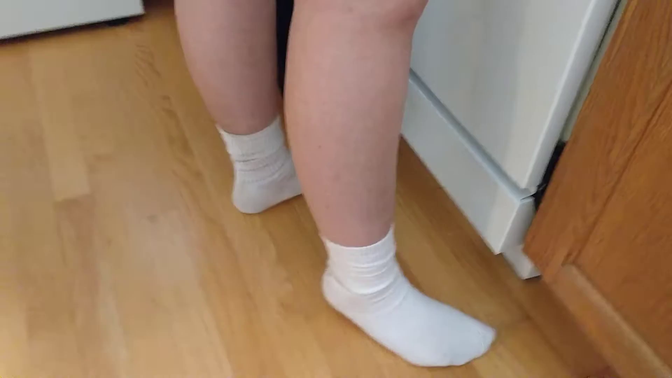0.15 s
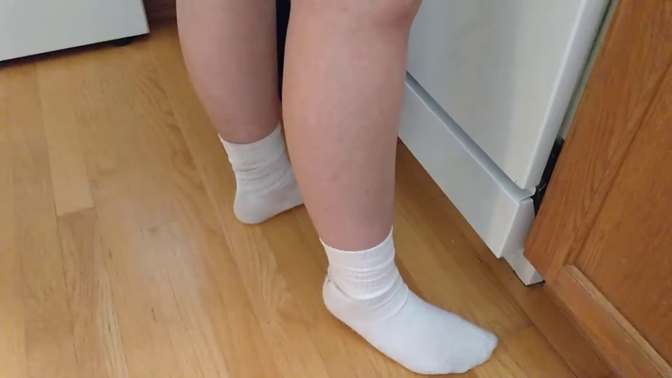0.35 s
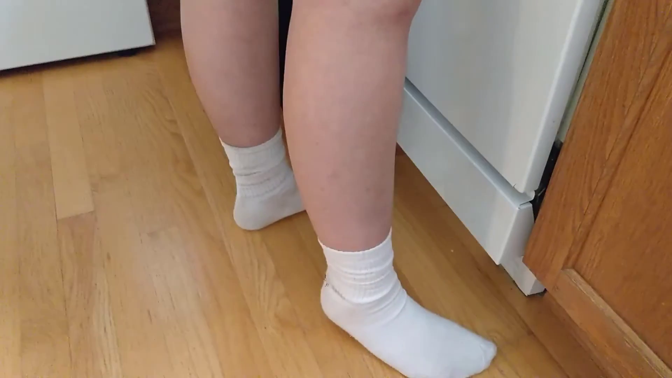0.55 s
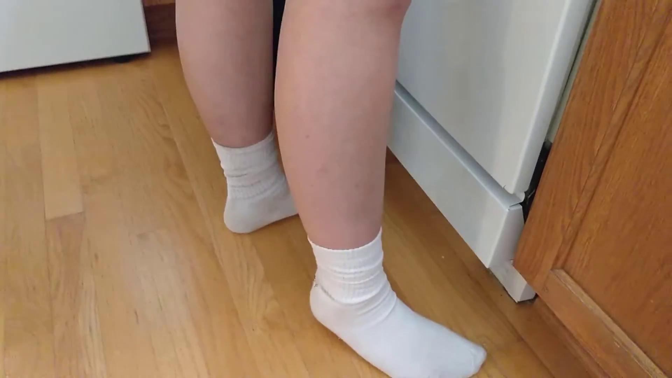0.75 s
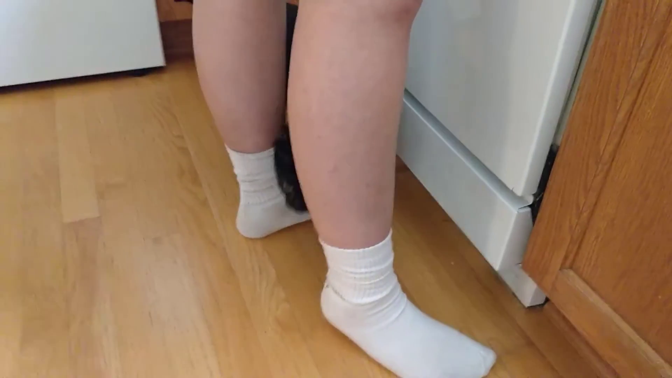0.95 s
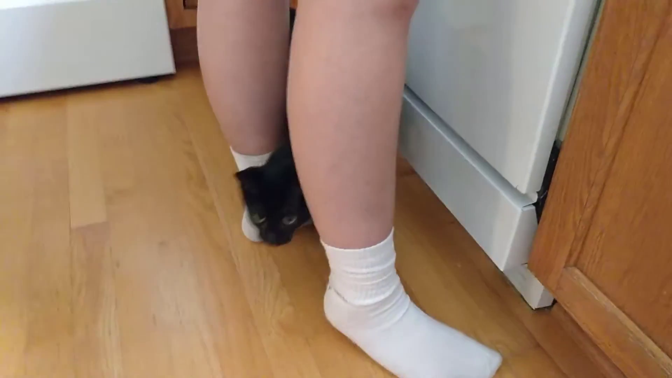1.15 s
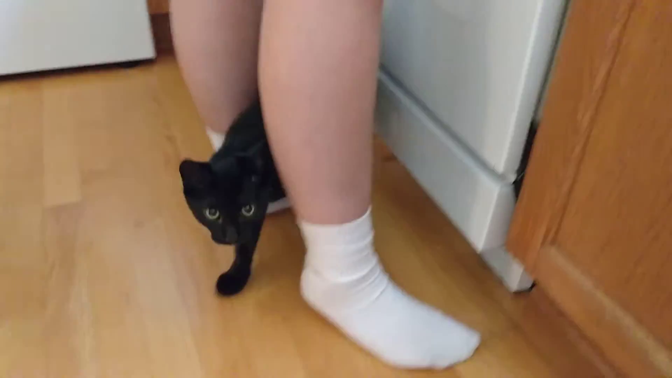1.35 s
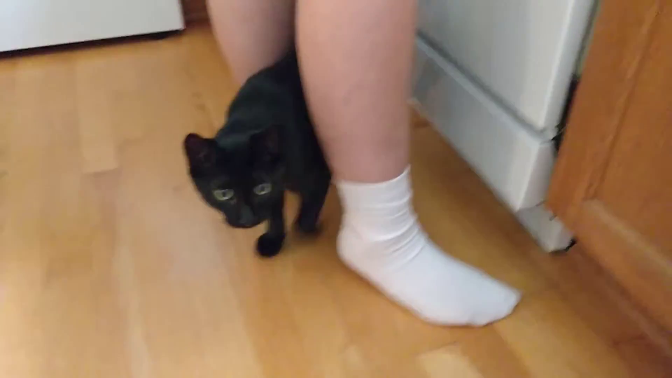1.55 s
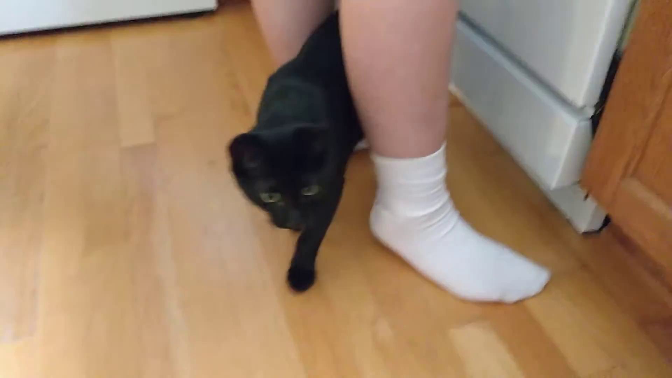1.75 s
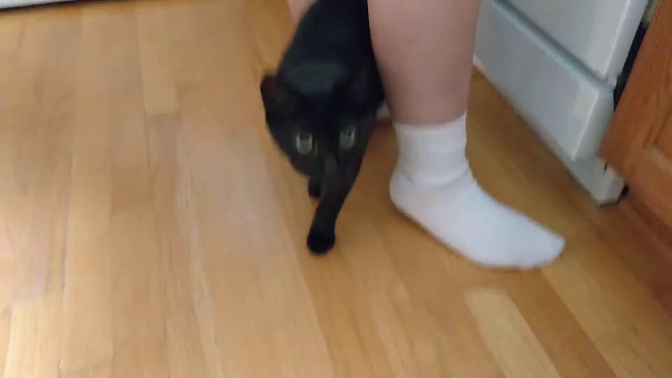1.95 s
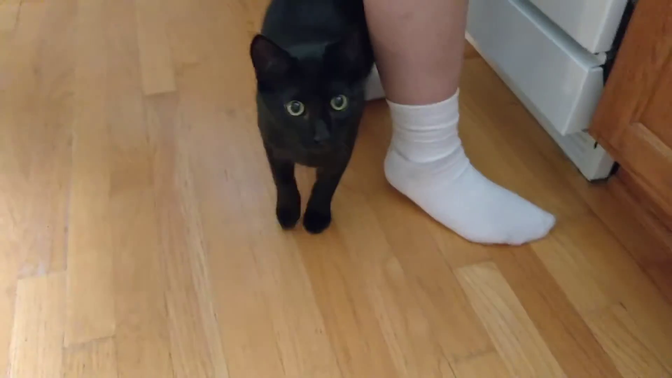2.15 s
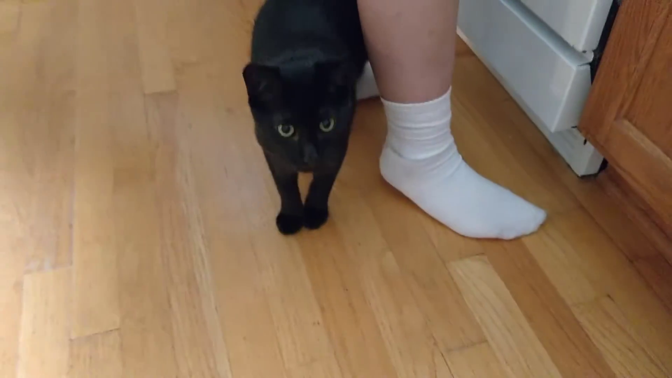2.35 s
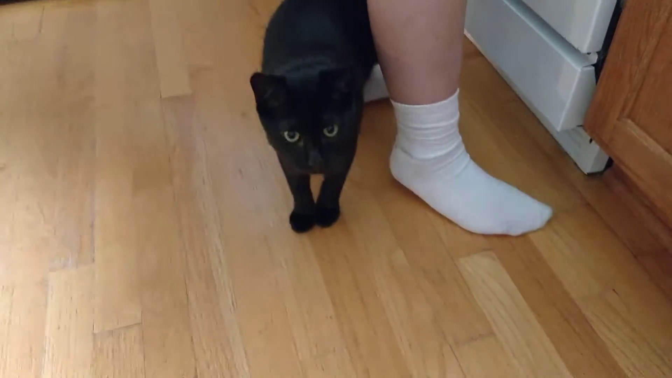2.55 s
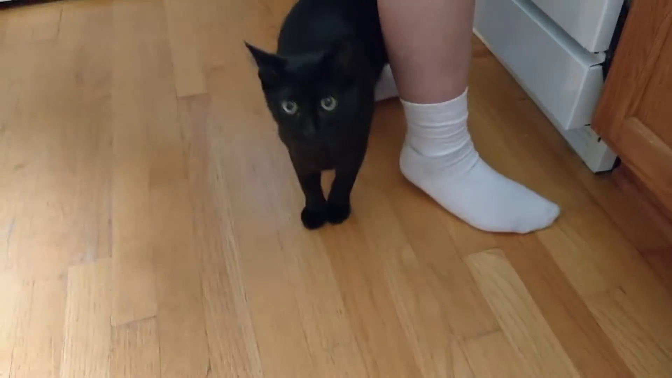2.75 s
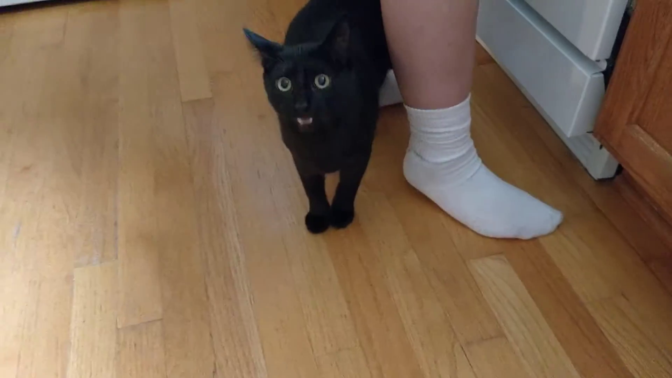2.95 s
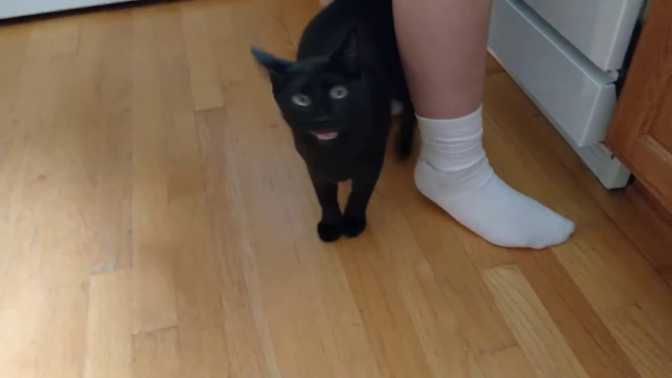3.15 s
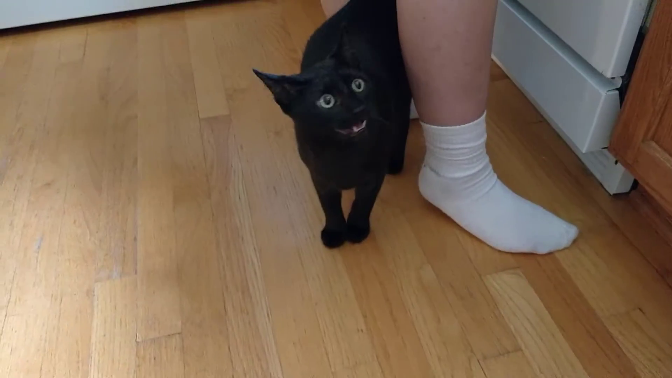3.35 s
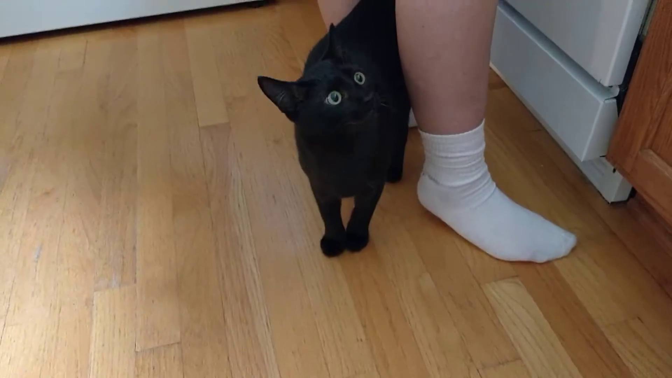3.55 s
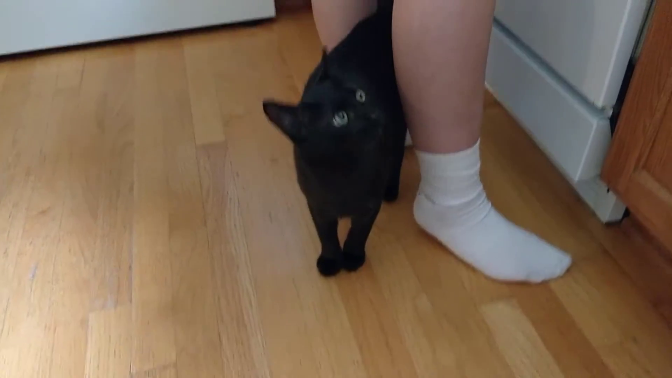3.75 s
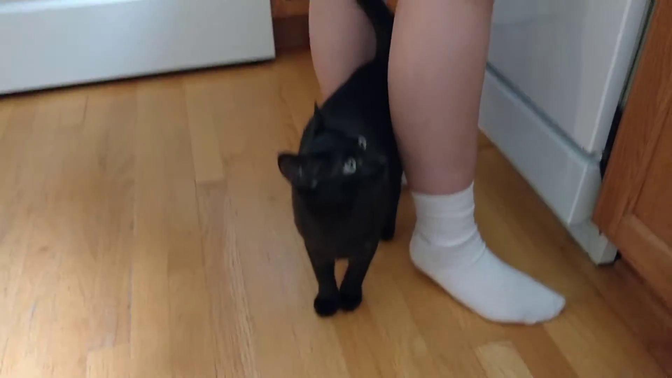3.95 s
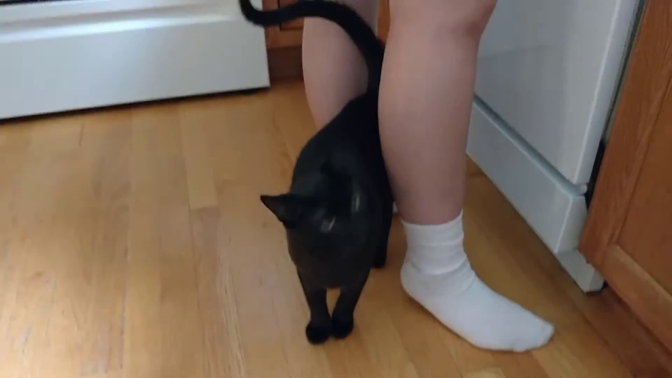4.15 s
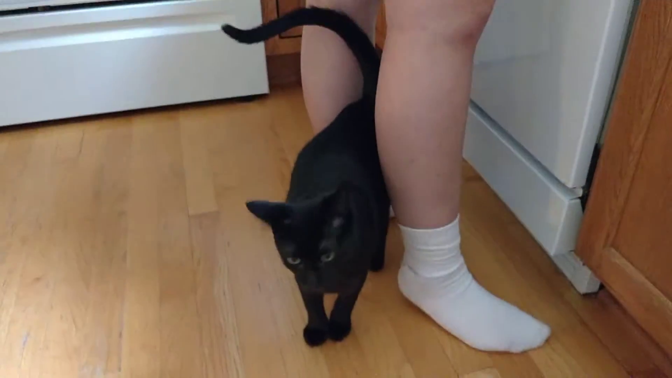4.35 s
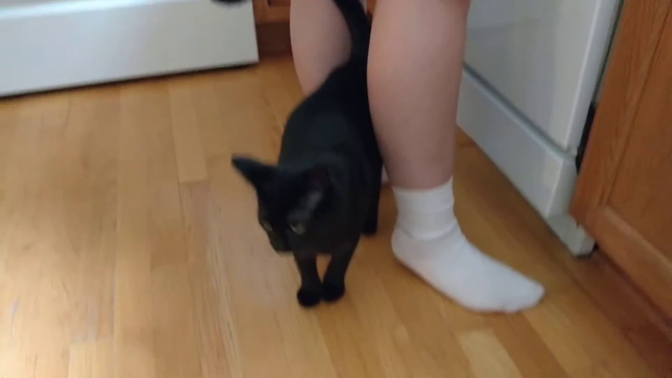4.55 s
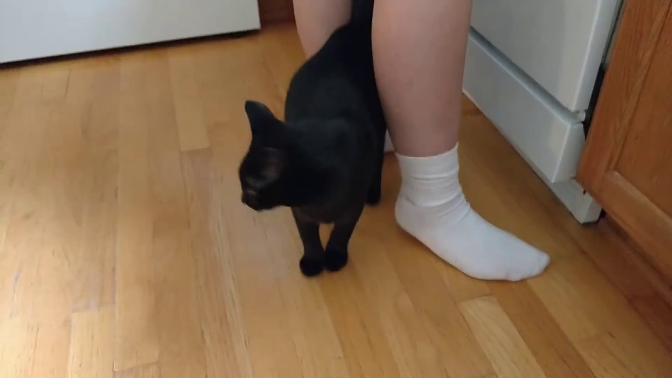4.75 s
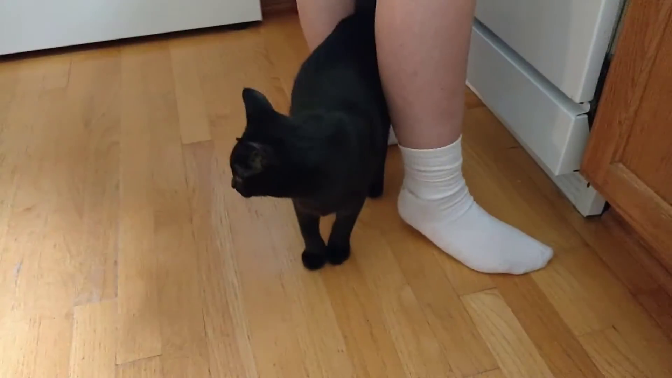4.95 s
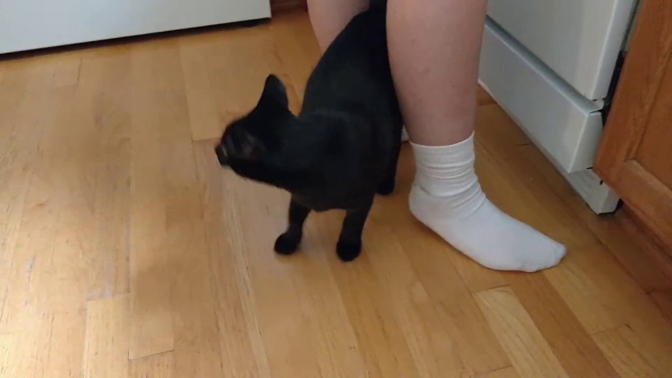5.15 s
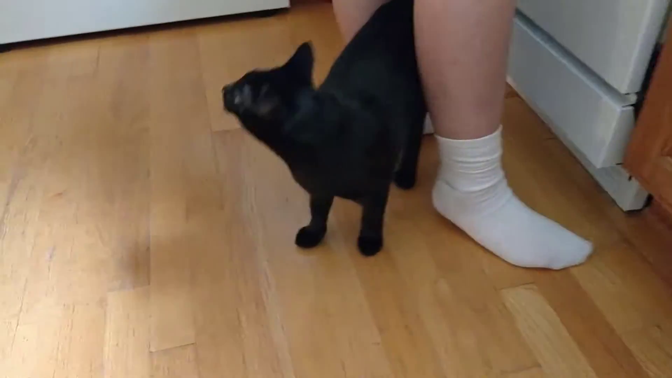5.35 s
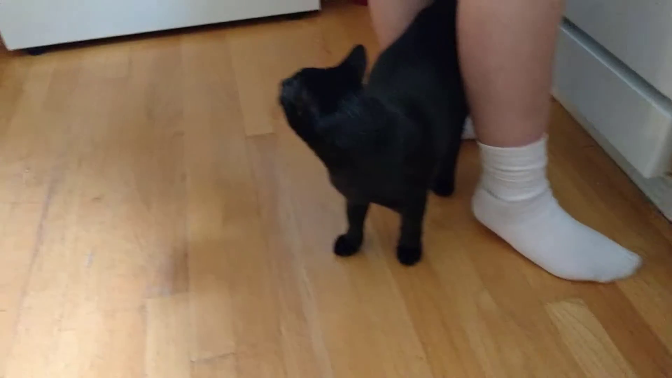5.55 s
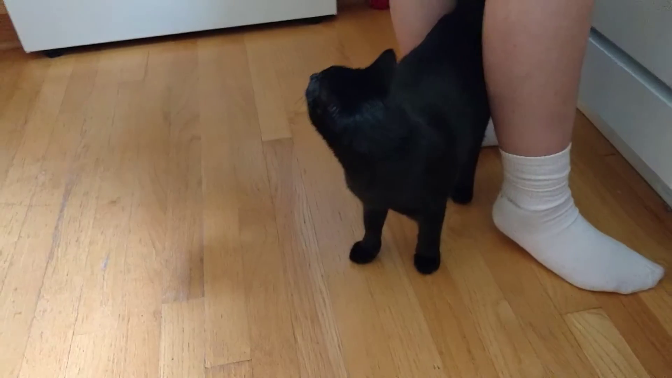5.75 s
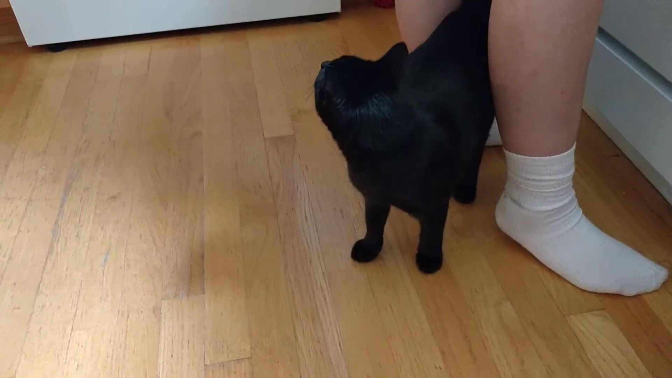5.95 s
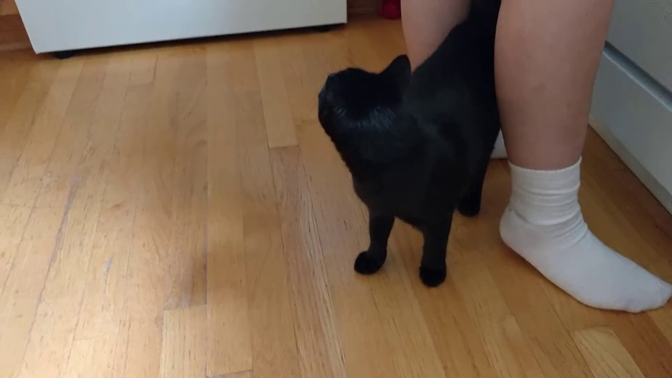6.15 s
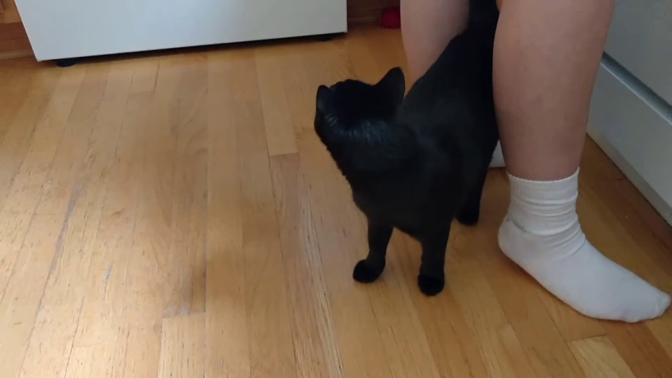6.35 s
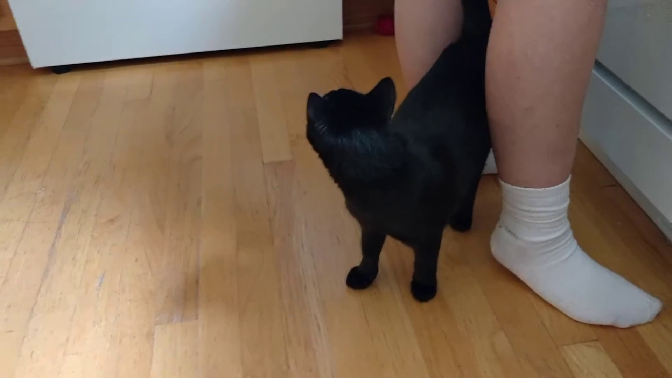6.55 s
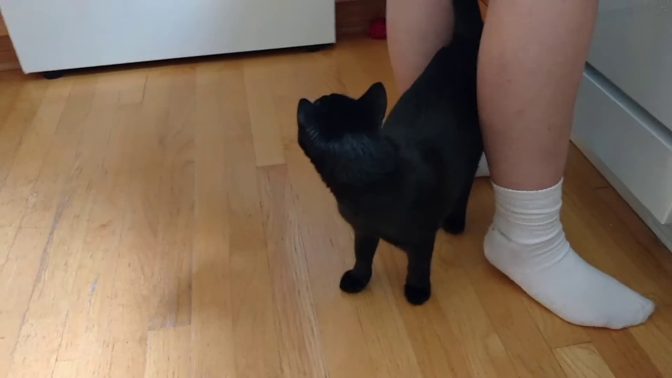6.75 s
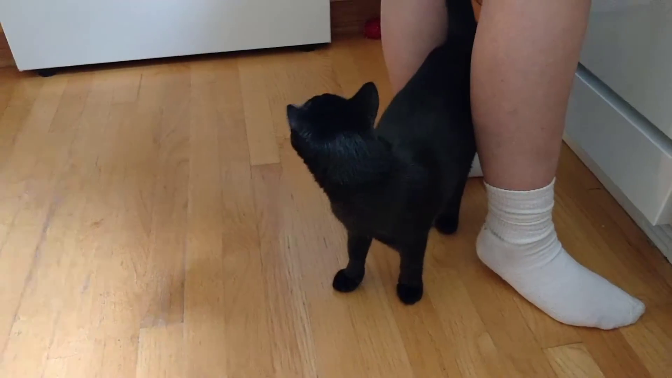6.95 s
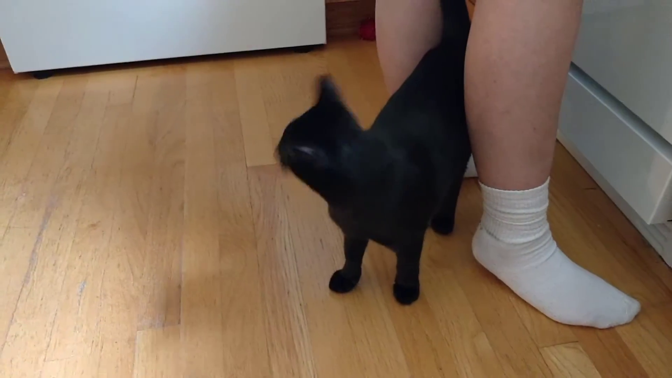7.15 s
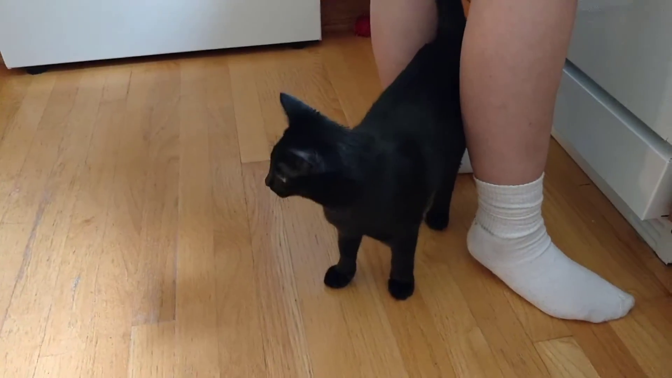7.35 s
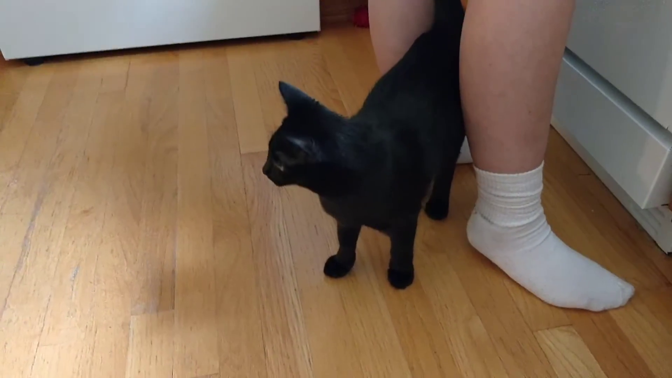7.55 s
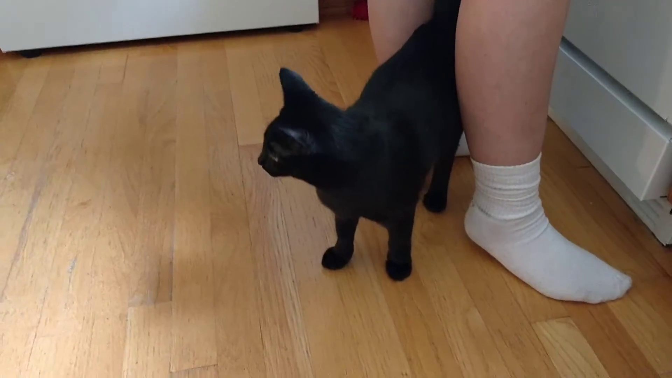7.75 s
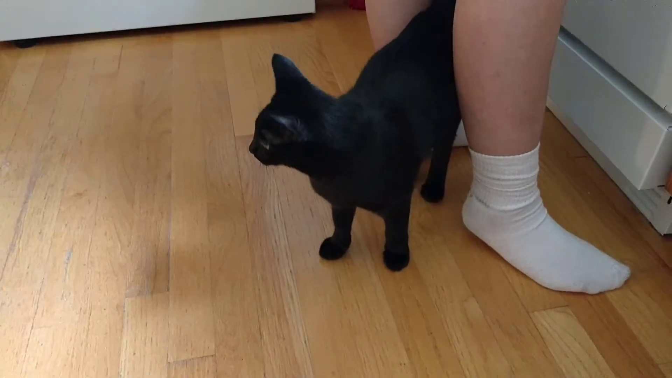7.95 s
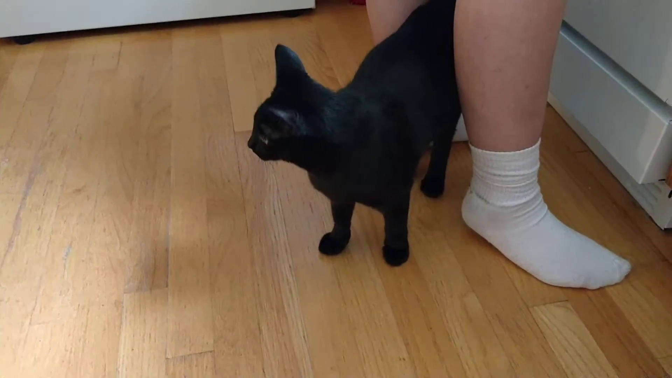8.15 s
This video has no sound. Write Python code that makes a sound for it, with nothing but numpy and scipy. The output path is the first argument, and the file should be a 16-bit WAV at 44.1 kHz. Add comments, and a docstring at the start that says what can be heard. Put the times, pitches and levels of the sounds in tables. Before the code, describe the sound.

In a small kitchen with a wooden floor, a soft low appliance rumble and wavering motor hum run throughout. A rustle and a hard ringing dish knock come first, then a few ticks. From about three seconds a black kitten gives three clear, slightly hoarse meows, each closing in a short croak. Dish knocks fall around the later meows, and a fourth, much quieter meow ends it. Close stereo pickup, short room tail.

```python
"""First a low appliance rumble, with a rustle and a hard knock of dishes on the counter above.
The rumble and a motor hum are noise and a wavering tone; knocks, ticks and rustles are bursts of noise.
From 2.8 s a young cat meows four times on a wooden kitchen floor, a metre from two microphone ports.
Each meow is a stack of sine overtones, made louder or softer by a moving mouth and throat.
Short croaks are puffs of low noise, and a small hard room adds a tail to all the near sounds."""
import sys
import numpy as np
from scipy import signal
from scipy.fft import rfft, irfft
from scipy.io import wavfile
from scipy.ndimage import uniform_filter1d

SR = 44100
rng = np.random.default_rng(int(sys.argv[2]) if len(sys.argv) > 2 else 0)


def output_pcm(signal):
    """Save a mono or channel-first signal as 16-bit PCM at the path in sys.argv[1].

    Samples are clipped to [-1, 1] before scaling.
    """
    pcm = np.clip(np.atleast_2d(signal).T, -1, 1) * 32767
    wavfile.write(sys.argv[1], SR, np.round(pcm).astype(np.int16))


N = 361619  # length in samples, 8.2 s


def undb(db):
    """Turn decibels into a factor for the wave."""
    return 10 ** (np.asarray(db) / 20)


def unit(x):
    """Scale a sound to an average (rms) level of 1."""
    return x / np.sqrt(np.mean(x ** 2))


def walk(rate, size):
    """Random wandering: values held for 1 / rate seconds, then smoothed twice; spread near 1."""
    hold = int(SR / rate)
    steps = np.repeat(rng.standard_normal(size // hold + 1), hold)
    smooth = uniform_filter1d(uniform_filter1d(steps, hold), hold)
    return 1.3 * smooth[:size]


def shape(x, gain):
    """Filter a sound by a gain that depends on frequency."""
    size = x.shape[-1]
    hz = np.arange(1, size // 2 + 2) * SR / size  # starts above zero so that its logarithm exists
    return irfft(rfft(x) * gain(hz), size)


def curve(points):
    """Make a gain curve through (Hz, dB) points."""
    hz, db = np.transpose(points)
    return lambda f: undb(np.interp(np.log(f), np.log(hz), db))


def hump(f, hz, width_hz):
    """Gain of a resonance applied twice: 1 at its centre, a half at each edge of its width."""
    return 1 / (1 + ((f - hz) / (width_hz / 2)) ** 2)


def stereo_noise(size, alike_hz):
    """Noise that both ports share in the bass and not in the treble."""
    mid, side = rng.standard_normal((2, size))
    side = shape(side, lambda f: np.clip(f / alike_hz, .25, 1))
    return np.array([mid + side, mid - side])


def band(size, hz, width_hz):
    """Noise in one resonance, at an rms level of 1."""
    return unit(shape(stereo_noise(size, 1500), lambda f: hump(f, hz, width_hz)))


def pan(db):
    """Left and right gains that differ by this many dB."""
    return undb(np.array([[db], [-db]]) / 2)


def add(out, x, s):
    """Mix a sound in, starting at s seconds."""
    i = int(s * SR)
    out[:, i:i + x.shape[1]] += x[:, :N - i]


def spells(rows, rise_db_per_s):
    """Summed gain of sounds that each swell, hold and fade."""
    t = np.arange(N) / SR
    total = 0
    for s, hold, db, fade in rows:
        swell_db = rise_db_per_s * np.maximum(s - t, 0)
        fade_db = fade * np.maximum(t - s - hold, 0)
        total = total + undb(db - swell_db - fade_db)
    return total


# Tone colour of the rumble. Each row: frequency in Hz, relative strength in dB per Hz.
RUMBLE_COLOUR = [(20, -6.5), (93, -9.5), (120, -9.5), (216, -14.5), (270, -9), (574, -14), (1150, -32.5),
                 (5230, -46.5), (16000, -51.5)]
# Loudness of the rumble over time. Each row: time in seconds, level in dB.
RUMBLE_LEVEL = [(0, -47.5), (.85, -48), (1.25, -46.5), (1.55, -46.5), (3., -41.5), (4.1, -39), (5.5, -40),
                (5.93, -36), (6.3, -53), (7.3, -49.5), (8.2, -42.5)]
# Narrow resonances in the rumble. Each row: frequency in Hz, width in Hz, dB relative to the rumble.
CABINET_RESONANCES = [(247, 3.9, -7.5), (273.8, 7.8, -6), (380.6, 13.94, -9.5), (561.4, 10, -7)]


def appliance_rumble():
    """Low noise whose octaves flicker one by one, with narrow cabinet resonances on top."""
    level_db = np.interp(np.arange(N) / SR, *np.transpose(RUMBLE_LEVEL))
    noise = shape(stereo_noise(N, 970), curve(RUMBLE_COLOUR))
    rumble = 0
    for low in 20 * 2 ** np.arange(10):
        octave = shape(noise, lambda f: (f >= low) & (f < 2 * low))
        rumble = rumble + undb(0.28 * walk(7.4, N)) * octave
    cabinet = sum(undb(db) * band(N, hz, width_hz) for hz, width_hz, db in CABINET_RESONANCES)
    return undb(level_db) * (unit(rumble) + cabinet)


# Times when the motor tone stands out.
# Each row: full level from this second, hold in seconds, level in dB, fade in dB per second.
MOTOR_TIMES = [(.85, 1.64, -43.5, 20), (2.75, 1.08, -41.5, 185), (5.45, 0.21, -46, 53), (6.7, 1.4, -44, 48)]
MOTOR_HZ, MOTOR_RISE_DB_PER_S = 91.2, 60


def motor_hum():
    """A low sine tone whose pitch and loudness both waver."""
    hz = MOTOR_HZ * (1 + .02 * walk(7.2, N))
    tone = np.sin(2 * np.pi * np.cumsum(hz) / SR) * undb(2.0 * walk(7.6, N))
    return spells(MOTOR_TIMES, MOTOR_RISE_DB_PER_S) * tone


# Tone colour of rustling. Each row: frequency in Hz, relative strength in dB per Hz.
RUSTLE_COLOUR = [(1000, -41), (2090, -14), (5300, -1), (7570, -1.5), (9210, -28), (11200, -4), (16000, -5)]


def airy_noise(size):
    """Noise with the tone colour of rustling, rms 1."""
    return unit(shape(stereo_noise(size, 1100), curve(RUSTLE_COLOUR)))


# Times of the rustles.
# Each row: full level from this second, hold in seconds, level in dB, fade in dB per second.
RUSTLE_TIMES = [(.12, 1.096, -41, 46), (2.14, 0.026, -49.5, 11.5), (3.63, 0.27, -53, 51.5),
                (5.1, 0.79, -55.5, 43), (5.94, 0.06, -45.5, 95.5), (6.04, 0.027, -28, 198.5),
                (7.26, 0.019, -61, 78.5)]
RUSTLE_RISE_DB_PER_S, HISS_DB = 150, -73


def rustling():
    """Fine grainy treble noise: a faint steady hiss with louder spells."""
    grain = undb(0.41 * walk(16, N) + 1.1 * walk(70, N))
    return (undb(HISS_DB) + spells(RUSTLE_TIMES, RUSTLE_RISE_DB_PER_S)) * airy_noise(N) * grain


# Small dry ticks. Each row: start in seconds, level in dB, centre in Hz, width in Hz.
TICK_TIMES = [(0.545, -29, 4050, 2560), (0.829, -24, 5180, 900), (0.881, -28, 4630, 2480),
              (2.132, -39, 4060, 3000), (2.924, -21.5, 12900, 5920), (3.035, -17.5, 3820, 3420),
              (7.841, -45, 3430, 910), (8.12, -29, 12600, 6960), (8.124, -36, 3430, 3980)]


def tick(db, hz, width_hz):
    """Noise in one resonance: it rises in 3 ms and falls by 60 dB every 44 ms."""
    t = np.arange(int(.05 * SR)) / SR
    return undb(db - 60 * t / 0.044) * np.minimum(t / .003, 1) * band(len(t), hz, width_hz)


# Tone colour of the hard contact. Each row: frequency in Hz, relative strength in dB per Hz.
CRACK_COLOUR = [(700, -46), (1300, -6), (2740, -8.5), (3900, 3), (4600, 1.5), (6000, -10), (8400, -2.5),
                (9300, -35)]
# Ringing tones of a dish. Each row: frequency in Hz, relative level in dB, time to fall 60 dB in seconds.
DISH_MODES = [(800, -22.5, 0.11), (2107, -11.5, 0.17), (3834, -7.5, 0.32), (4420, -9.5, 0.3),
              (5240, -8, 0.37), (5886, 2, 0.32)]
# Knocks of dishes. Each row: landing time in seconds, overall level in dB; body, treble and ring in dB
# relative to that level; time for the contact to fall 60 dB in seconds; left minus right in dB.
KNOCK_TIMES = [(0.1915, -16.5, -8, -6.5, -4.5, 0.14, -0.5), (0.483, -49, 18.5, -12, -19, 0.16, 0),
               (1.049, -40.5, 14, -19, 0, 0.076, 1), (3.736, -53.5, 15.5, 7, -22, 0.035, -5),
               (5.046, -19, -7.5, -12, -12.5, 0.11, 0.5), (6.0716, -16, -7.5, -3.5, 3.5, 0.15, -2.5),
               (6.591, -43, 9.5, -10, 16.5, 0.061, 0.5)]
LEAD_S = .1  # sound made ready before the landing
RATTLE_S, SCUFF_S, SCUFF_DB = 0.024, 0.046, -15


def knock(db, body_db, treble_db, ring_db, t60):
    """A short rattle of contacts dies away; the counter thuds under it and the dish rings on."""
    t = np.arange(-LEAD_S, .6, 1 / SR)
    before, t = np.maximum(-t, 0), np.maximum(t, 0)
    # a dull blow is a soft contact: it pushes longer and leaves the high modes still
    rise_s = .001 + .0004 * undb(body_db)
    dull = 1.82 * max(body_db, 0)  # dB lost per octave above 2000 Hz
    decay_db = -60 * np.maximum(t - RATTLE_S, 0) / max(t60, .02)
    fade = (1 - np.exp(-t / rise_s)) * undb(decay_db)
    # a dull blow slides in before it lands
    scuff = (body_db > 0) * (t < RATTLE_S) * undb(SCUFF_DB) * np.exp(-before / SCUFF_S)
    fade = np.maximum(fade, scuff)
    crack = unit(shape(stereo_noise(len(t), 1500), curve(CRACK_COLOUR)))
    body = undb(body_db) * band(len(t), 668, 740)
    treble = undb(treble_db) * band(len(t), 13170, 4100)
    uneven = undb(2 * walk(250, len(t)))
    contact = (crack + body + treble) * fade * uneven
    ring = 0
    for hz, mode_db, t60_s in DISH_MODES:
        mode_level = undb(mode_db - dull * np.log2(hz / 2000) - 60 * t / t60_s)
        # narrow noise stands for a cluster of close partials that beat roughly
        ring = ring + mode_level * band(len(t), hz, .07 * hz)
    return undb(db) * (contact + undb(ring_db) * ring * np.minimum(t / .004, 1))


# The throat closes with a short low croak.
# Each row: time of the loudest point in seconds, level in dB, centre in Hz, length in seconds.
CROAK_TIMES = [(3.557, -27, 536, 0.029), (4.854, -23, 467, 0.021), (5.487, -32, 616, 0.02),
               (6.048, -19, 518, 0.032)]
PUFF_DB = -15.5  # air that escapes with a croak, relative to it


def croak(db, hz, length_s):
    """A smooth puff of noise in one low resonance, with a little air on top."""
    t = np.arange(-3 * length_s, 3 * length_s, 1 / SR)
    puff = band(len(t), hz, 218.5) + undb(PUFF_DB) * airy_noise(len(t))
    return undb(db) * np.exp(-(t / length_s) ** 2) * puff


def share(f, hz, width_hz):
    """Shares of the overtones f in a steep resonance; their power sums to 1."""
    gain = hump(f, hz, width_hz) ** 1.73
    return gain / np.sqrt(np.sum(gain ** 2, axis=0))


# One list for each meow. Each row: time in seconds, pitch in Hz, level through the mouth in dB,
# mouth resonance in Hz, throat resonance level in dB, lowest tone (fundamental) level in dB.
MEOW_PATHS = [
    [(2.835, 790, -43, 1540, -54, -44), (2.868, 788, -46, 1570, -32, -33.5),
     (2.883, 774, -35, 1500, -49, -28), (2.897, 650, -34, 1300, -32.5, -35),
     (2.945, 648.4, -36.5, 1540, -32, -39.5), (2.97, 667, -27.5, 1550, -48.5, -40),
     (3.025, 685.5, -33, 1650, -40.5, -36.5), (3.045, 662.6, -25.5, 2280, -14.5, -40.5),
     (3.1, 671.7, -20.5, 1960, -17, -44), (3.18, 655.2, -23, 1810, -14, -33),
     (3.26, 641, -30.5, 1732, -23.5, -42), (3.36, 652, -26, 1657, -20.5, -34),
     (3.47, 678, -26, 1620, -32.5, -40), (3.55, 624, -38, 1254, -41, -26)],
    [(4.12, 660, -37.5, 1400, -33, -52), (4.17, 600.6, -25, 1310, -40.5, -31.5),
     (4.238, 635.3, -28, 1740, -36, -35.5), (4.255, 640.7, -27.5, 1790, -24.5, -35),
     (4.3, 645, -22.5, 1780, -23, -34.5), (4.38, 620, -20, 1660, -27.5, -31),
     (4.5, 634.6, -20.5, 1660, -37, -36.5), (4.62, 625, -22, 1540, -44.5, -36.5),
     (4.77, 641.6, -31, 1550, -56, -38), (4.85, 576, -31.5, 1253, -59, -24.5)],
    [(5.47, 639, -41, 1300, -68, -36), (5.51, 508.4, -37.5, 1070, -42, -35),
     (5.56, 483.6, -44, 1100, -35.5, -39), (5.61, 542.6, -33, 1980, -33.5, -36),
     (5.66, 589, -27, 2180, -30, -29.5), (5.72, 626.3, -28.5, 2130, -33.5, -37),
     (5.92, 643.7, -24.5, 1880, -51, -29.5), (6.03, 610.4, -32, 1510, -65, -23.5)],
    [(7.48, 513, -50, 1190, -55, -52), (7.57, 491.6, -51, 1210, -51.5, -51),
     (7.635, 528, -37.5, 1080, -42.5, -40), (7.69, 589.6, -42.5, 1390, -50.5, -39),
     (7.88, 650.3, -38.5, 1500, -54, -41), (8.0, 639.3, -39, 1569, -45.5, -43),
     (8.09, 628, -38, 1590, -52, -47), (8.185, 550, -31, 1180, -48, -28.5)],
]
# Throat setting of each meow. Each row: left minus right in dB, first throat resonance in Hz, later
# throat resonance in Hz, share of the call at which the later one takes over, throat width in Hz,
# upper resonance in Hz, upper resonance over the throat in dB, hoarseness from 0 to 1.
THROAT_SETTINGS = [(0.17, 3270, 3800, 0.42, 950, 7070, -1.5, .45),
                   (0.5, 3440, 3250, 0.37, 980, 6600, 4.5, .8), (2.1, 4000, 4283, 0.28, 1500, 6840, 9, .7),
                   (5, 3100, 4300, 0.26, 550, 6150, -10.5, .3)]
MOUTH_WIDTH = 0.57  # as a share of the mouth resonance
UPPER_WIDTH_HZ = 1700
UPPER_RISE_DB, UPPER_RISE_SHARE = 20.5, 0.61  # the upper resonance wakes over the first part of a call
UPPER_FOLLOWS = 0.32  # power by which the upper resonance follows the pitch
SHEEN_HZ, SHEEN_WIDTH_HZ, SHEEN_DB = 14250, 7800, -16.5  # highest resonance, dB relative to the upper one
THROAT_SAG = .45  # octaves the throat falls for each octave the mouth closes
NARROWING = 1.1  # power by which the throat width shrinks as the mouth closes
THROAT_OVERLAP = 0.097  # least share of the fainter throat resonance
SHIFT_SHARE = 0.053  # softness of the throat change, as a share of the call
VALLEY_HZ, VALLEY_WIDTH_HZ = 5370, 700  # a side pocket of the throat swallows overtones here
HOARSE_S, ATTACK_S, RELEASE_S = 0.067, 0.0073, 0.016


def meow(rows, early_hz, late_hz, shift, width_hz, upper_hz, lift_db, rough):
    """Vocal fold overtones through a moving mouth and throat; hoarse at the start and in pitch slides."""
    s, *columns = np.transpose(rows)
    t = np.arange(s[0], s[-1] + 0.018, 1 / SR)
    size = len(t)
    paths = [uniform_filter1d(np.interp(t, s, c), size=350) for c in columns]
    hz, mouth_db, mouth_hz, throat_db, first_db = paths
    progress = np.linspace(0, 1, size)

    # the mouth and throat move together
    middle_hz = np.median(mouth_hz)
    closing = progress * np.log2(middle_hz / mouth_hz)
    width_hz = width_hz * np.minimum(mouth_hz / middle_hz, 1) ** NARROWING
    takeover = 1 / (1 + np.exp((shift - progress) / SHIFT_SHARE))
    late = THROAT_OVERLAP + (1 - 2 * THROAT_OVERLAP) * takeover
    sag = 2 ** (-THROAT_SAG * np.maximum(closing, 0))
    upper_db = throat_db + lift_db - UPPER_RISE_DB * np.maximum(1 - progress / UPPER_RISE_SHARE, 0)

    # hoarseness makes the pitch unsteady and weakens the upper overtones
    slide = uniform_filter1d(np.abs(np.gradient(np.log(hz))) * SR, size=1300) / 1.2
    start = rough * np.exp(-(t - t[0]) / HOARSE_S)
    hoarse = np.clip(rough * slide + start, 0, 1)
    waver = .003 * walk(45, size) + .011 * hoarse ** 2 * walk(200, size)
    phase = 2 * np.pi * np.cumsum(hz * (1 + waver)) / SR
    clear = 1 - .9 * np.maximum(start, hoarse ** 2 * (1 - progress) ** 4)

    # loudness of overtones 2 to 24
    f = np.arange(2, 25)[:, None] * hz
    mouth = share(f, mouth_hz, MOUTH_WIDTH * mouth_hz)
    throat = (1 - late) * share(f, early_hz * sag, width_hz) + late * share(f, late_hz * sag, width_hz)
    upper = share(f, upper_hz * (hz / np.median(hz)) ** UPPER_FOLLOWS, UPPER_WIDTH_HZ)
    upper = upper + undb(SHEEN_DB) * share(f, SHEEN_HZ, SHEEN_WIDTH_HZ)
    gains = undb(mouth_db) * mouth + clear * (undb(throat_db) * throat + undb(upper_db) * upper)
    gains = gains * (1 - .7 * hump(f, VALLEY_HZ, VALLEY_WIDTH_HZ))

    voice = 0
    for k, gain in enumerate([undb(first_db), *gains], start=1):
        # floor and cupboard echoes: each tone swells and fades on its own, differently at the two ports
        each_port = np.array([walk(18, size) for _ in range(2)])
        swell_db = (.5 + min(k, 8) / 4) * each_port
        swell_db = swell_db + (1 + min(k, 10) / 4) * walk(60, size)
        swell_db = swell_db + min(k, 10) / 4 * (.6 + hoarse) * walk(220, size)
        apart = min(k / 2, 1) * (np.pi / 4 + walk(6, size) / 4) * np.array([[1], [-1]])
        wave = np.sin(k * phase + apart + rng.uniform(0, 2 * np.pi))
        voice = voice + np.sqrt(2) * gain * undb(swell_db) * wave

    # breath leaks out when the voice is hoarse or the throat opens
    breath = undb(throat_db) * band(size, 3600, 1600)
    breath += undb(upper_db) * (band(size, upper_hz, 2200) + .4 * band(size, SHEEN_HZ, SHEEN_WIDTH_HZ))
    opening = uniform_filter1d(np.maximum(np.gradient(throat_db) * SR, 0), size=3500) / 500
    leak_db = -32 + 17 * np.minimum(hoarse + opening, 1) + 10 * start
    edge = np.clip(np.minimum((t - t[0]) / ATTACK_S, (t[-1] - t) / RELEASE_S), 0, 1)
    return edge * (voice + undb(leak_db) * breath)


ROOM_T60_S, ROOM_DB = .25, -10  # time to fall 60 dB; tail relative to the direct sound


def room(x):
    """Small hard room: a dense fading tail, eased in over 38 ms and different at each port."""
    t = np.arange(int(.5 * SR)) / SR
    tail = rng.standard_normal((2, len(t))) * undb(-60 * t / ROOM_T60_S) * np.minimum(t / 0.038, 1)
    tail *= undb(ROOM_DB) / np.sqrt(np.sum(tail ** 2, axis=1, keepdims=True))
    return x + signal.fftconvolve(x, tail, axes=1)[:, :N]


NOTCH_HZ, NOTCH_WIDTH_HZ = 9450, 3130


def scene():
    """Put the near sounds in the room, then add the kitchen background."""
    background = appliance_rumble() + motor_hum() + rustling()
    near = np.zeros((2, N))
    for s, *touch in TICK_TIMES:
        add(near, tick(*touch), s)
    for s, *blow, pan_db in KNOCK_TIMES:
        add(near, pan(pan_db) * knock(*blow), s - LEAD_S)
    for s, db, hz, length_s in CROAK_TIMES:
        add(near, croak(db, hz, length_s), s - 3 * length_s)
    for rows, (pan_db, *posture) in zip(MEOW_PATHS, THROAT_SETTINGS):
        add(near, pan(pan_db) * meow(rows, *posture), rows[0][0])
    # the microphones hear the near sounds weakly in one band
    near = shape(room(near), lambda f: 1 - 0.78 * hump(f, NOTCH_HZ, NOTCH_WIDTH_HZ))
    return near + background


# Tone of the two ports. Each row: frequency in Hz, gain of the left and loss of the right in dB.
PORT_TONE = [(800, 0.2), (4000, -1.5), (8000, -5), (12500, 3)]
TOP_HZ = 15900


def record(dry):
    """The left port favours the top, the right the low treble; peaks are rounded and the top is cut."""
    left = shape(dry[0], curve(PORT_TONE))
    right = shape(dry[1], lambda f: 1 / curve(PORT_TONE)(f))
    rounded = .88 * np.tanh(np.array([left, right]) / .88)
    top_cut = signal.ellip(10, .2, 75, TOP_HZ, fs=SR, output="sos")
    return signal.sosfilt(top_cut, rounded)


dry = scene()
out = record(dry)
output_pcm(out)
```